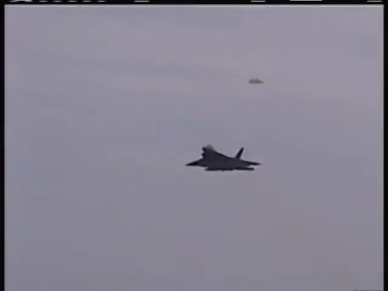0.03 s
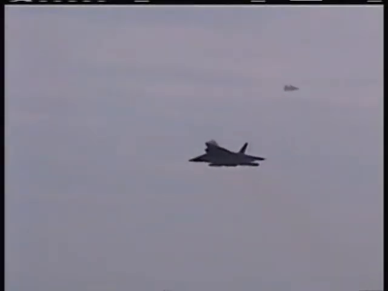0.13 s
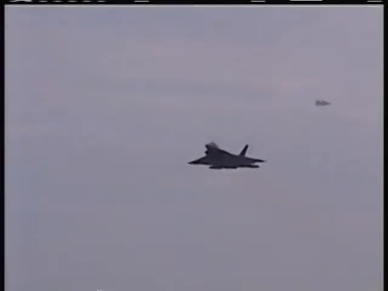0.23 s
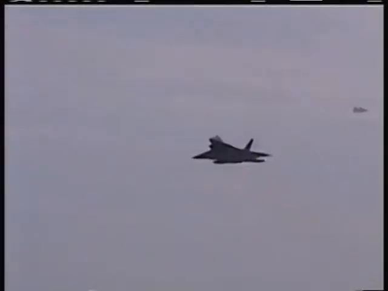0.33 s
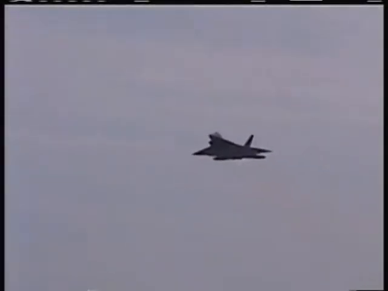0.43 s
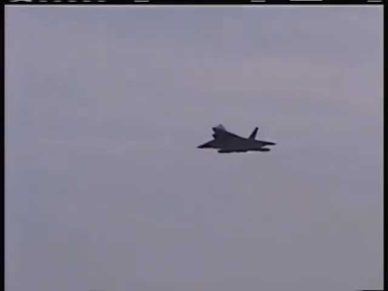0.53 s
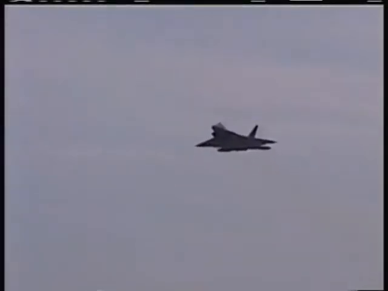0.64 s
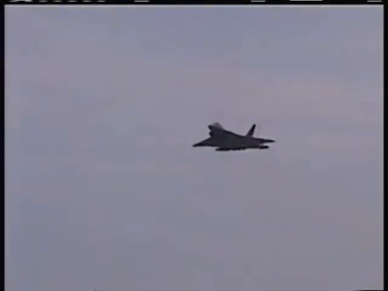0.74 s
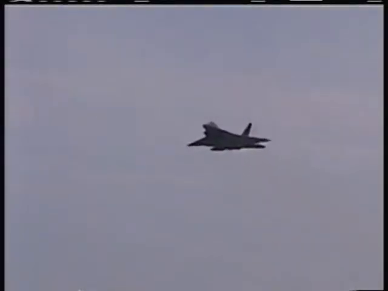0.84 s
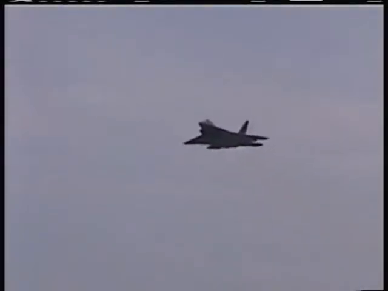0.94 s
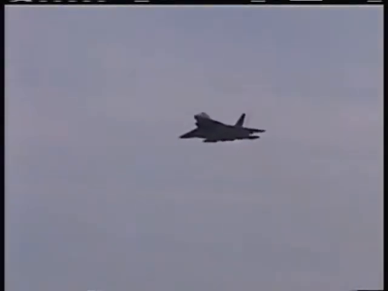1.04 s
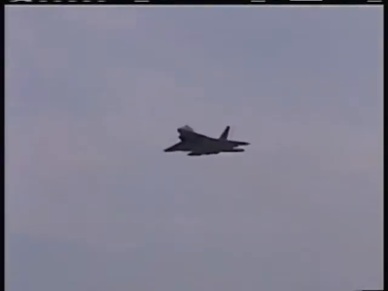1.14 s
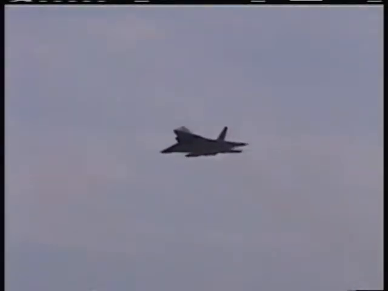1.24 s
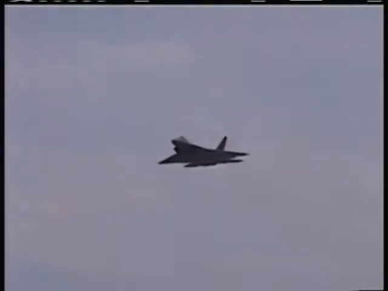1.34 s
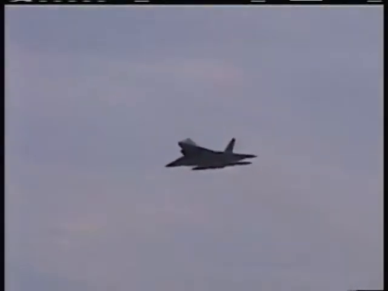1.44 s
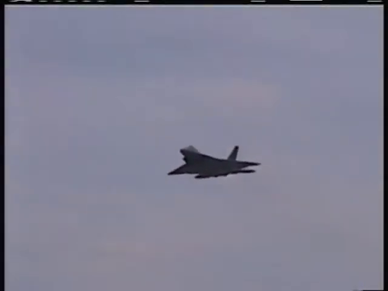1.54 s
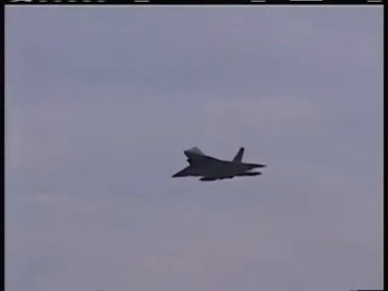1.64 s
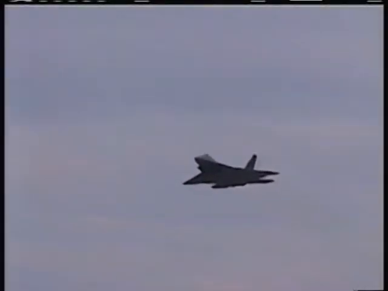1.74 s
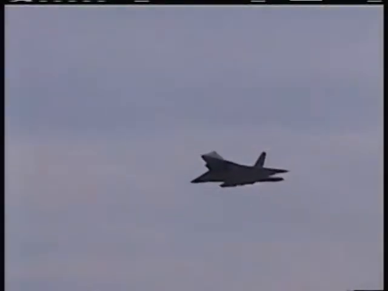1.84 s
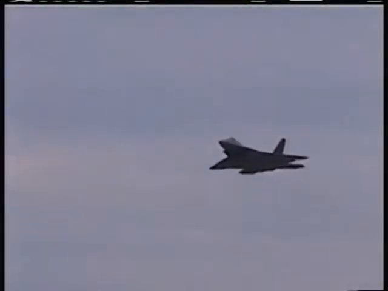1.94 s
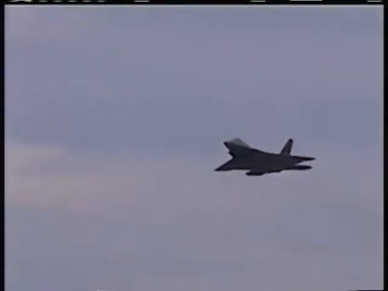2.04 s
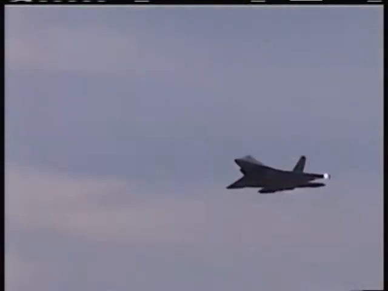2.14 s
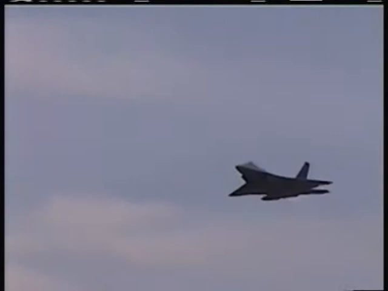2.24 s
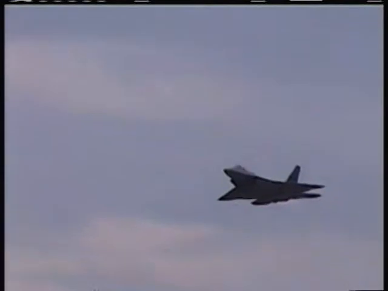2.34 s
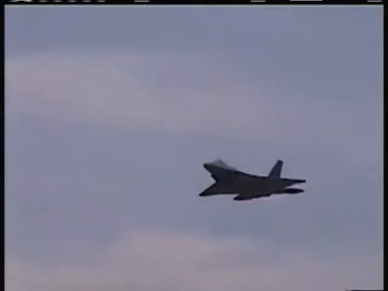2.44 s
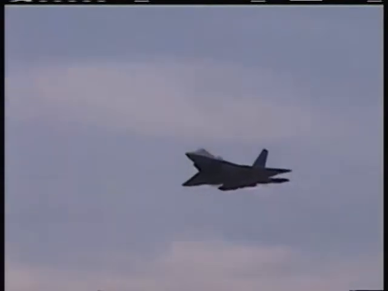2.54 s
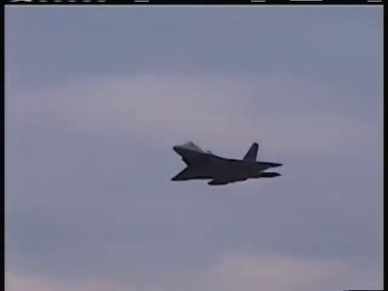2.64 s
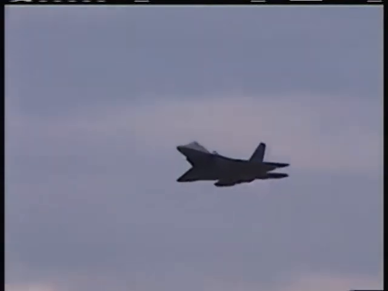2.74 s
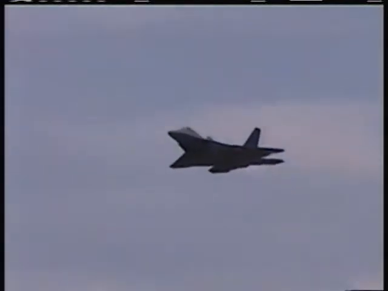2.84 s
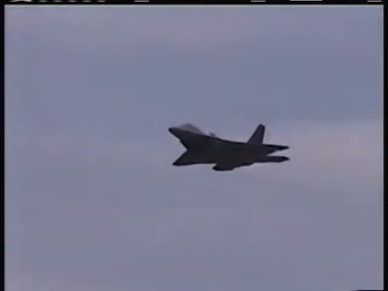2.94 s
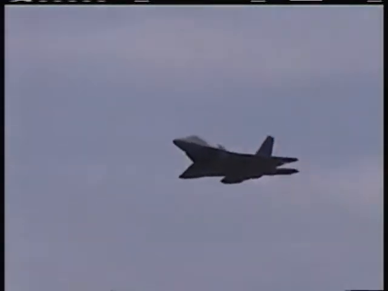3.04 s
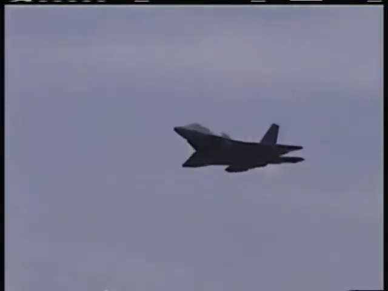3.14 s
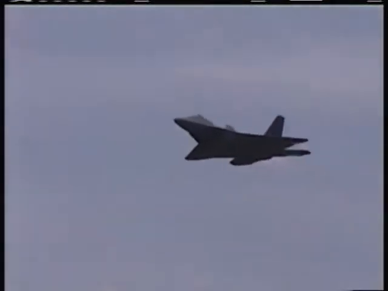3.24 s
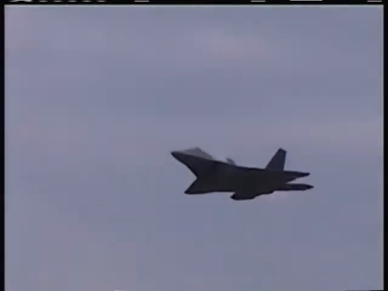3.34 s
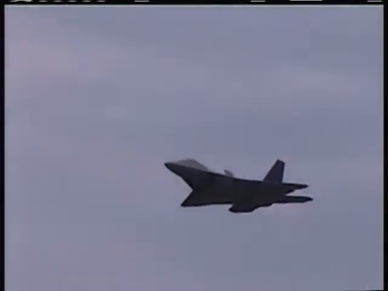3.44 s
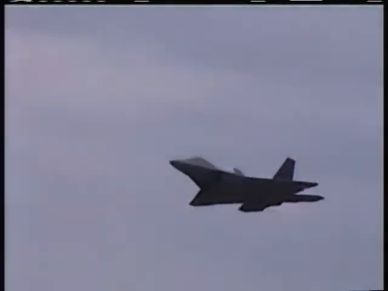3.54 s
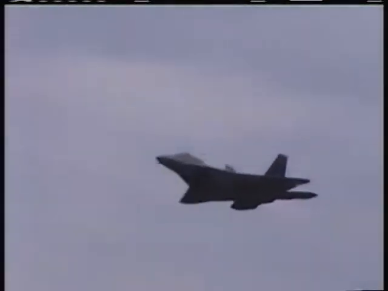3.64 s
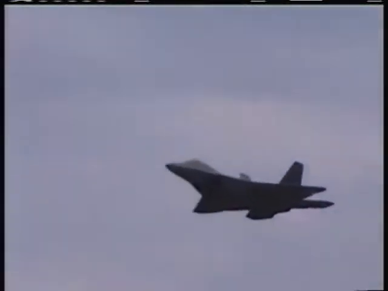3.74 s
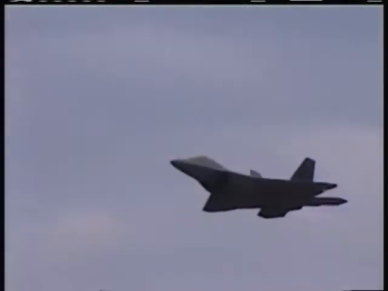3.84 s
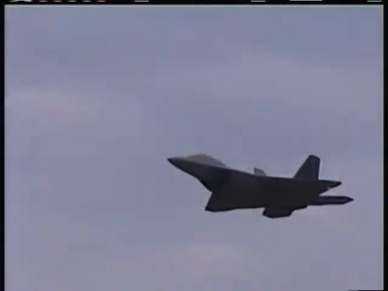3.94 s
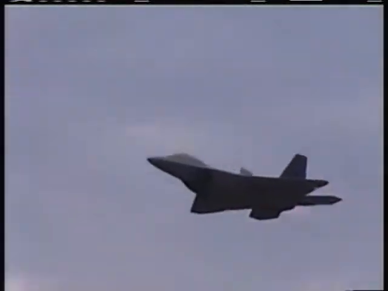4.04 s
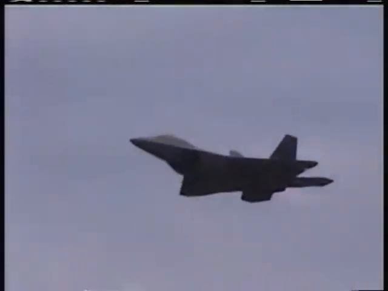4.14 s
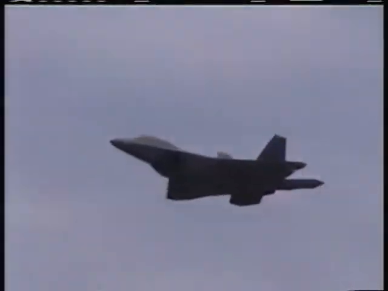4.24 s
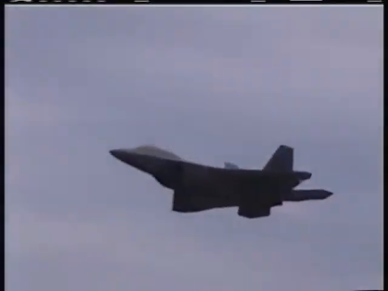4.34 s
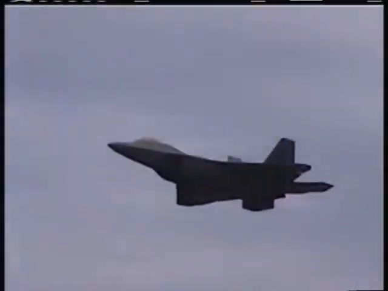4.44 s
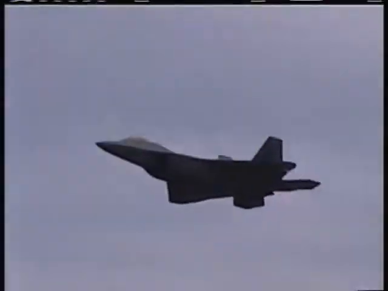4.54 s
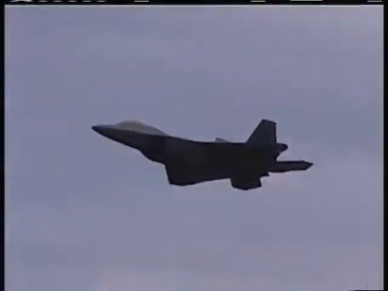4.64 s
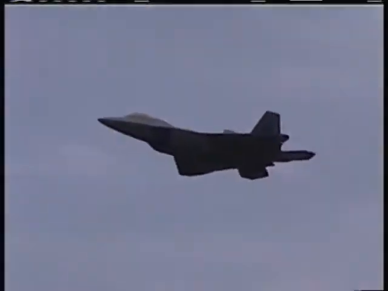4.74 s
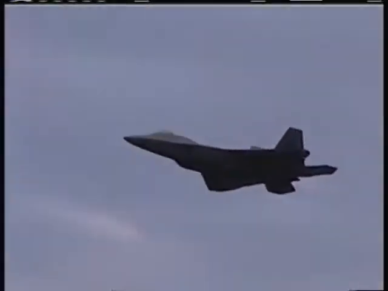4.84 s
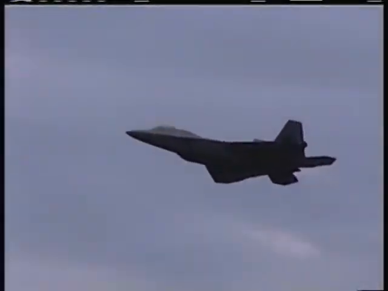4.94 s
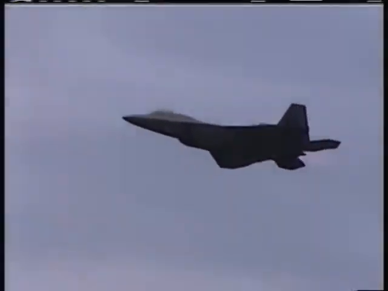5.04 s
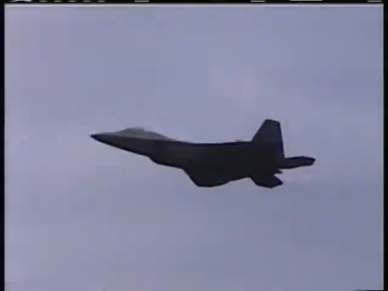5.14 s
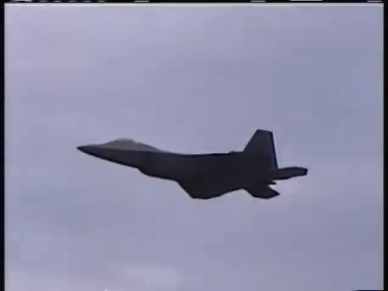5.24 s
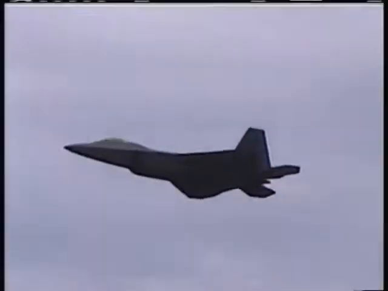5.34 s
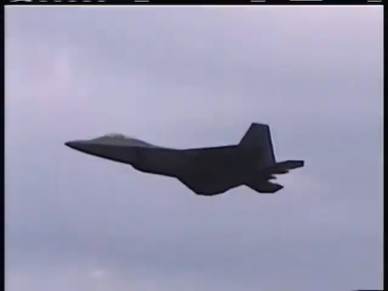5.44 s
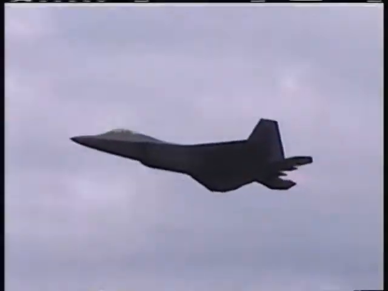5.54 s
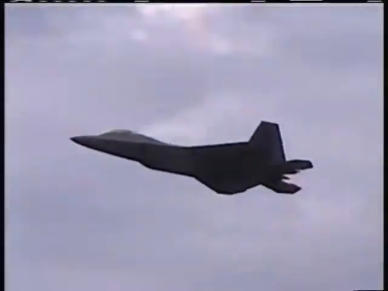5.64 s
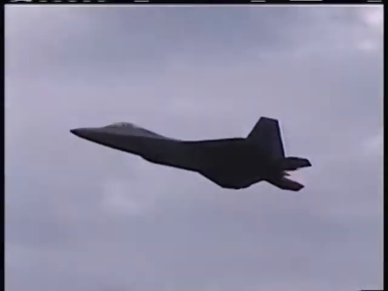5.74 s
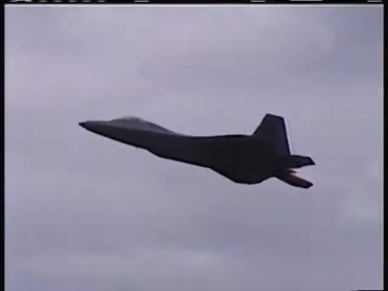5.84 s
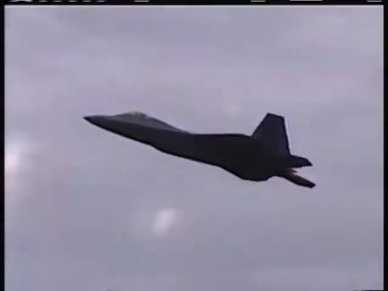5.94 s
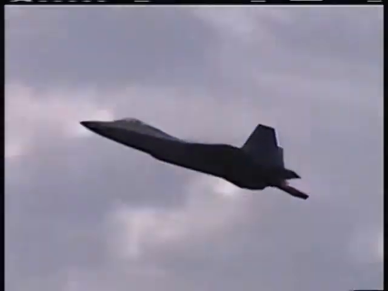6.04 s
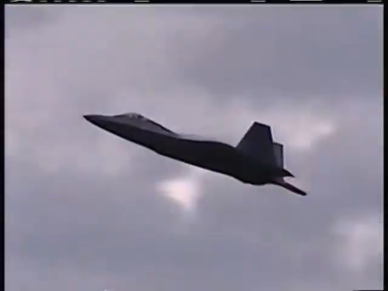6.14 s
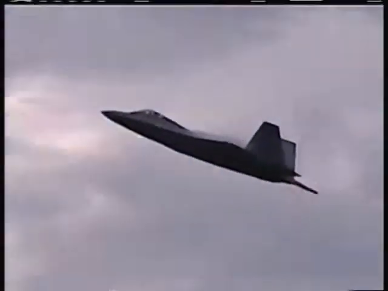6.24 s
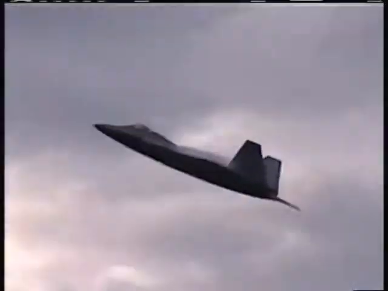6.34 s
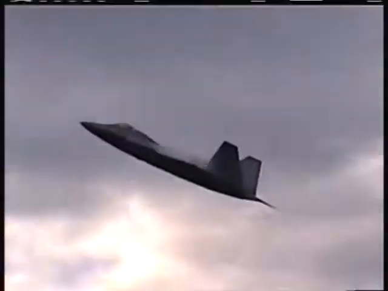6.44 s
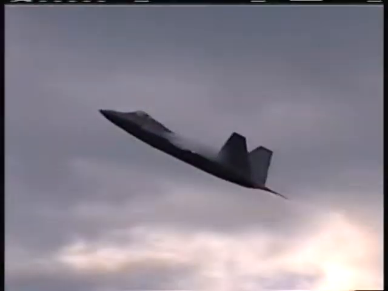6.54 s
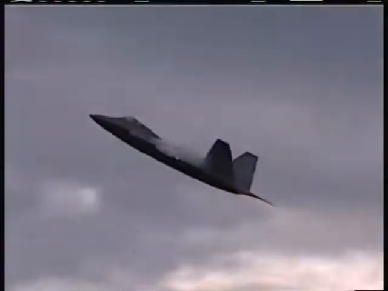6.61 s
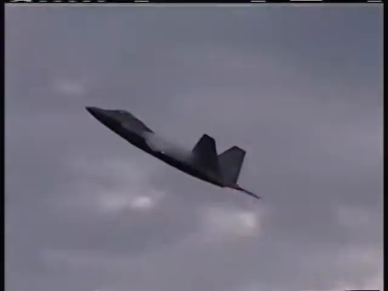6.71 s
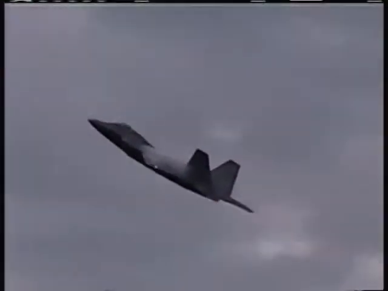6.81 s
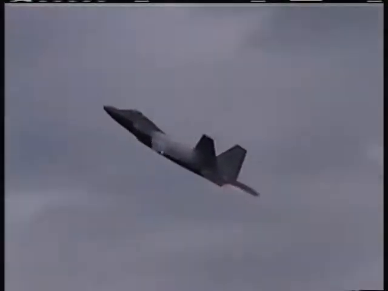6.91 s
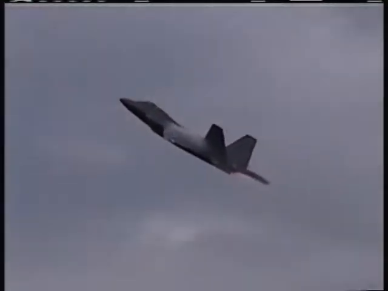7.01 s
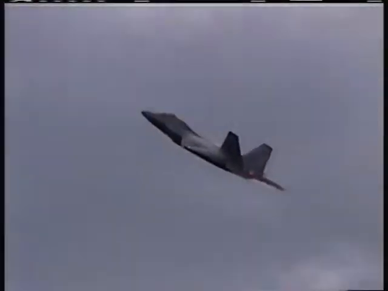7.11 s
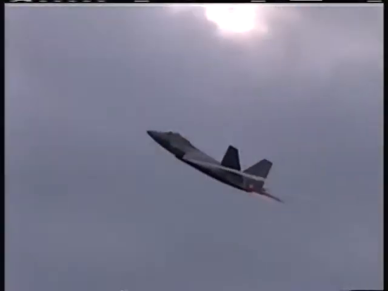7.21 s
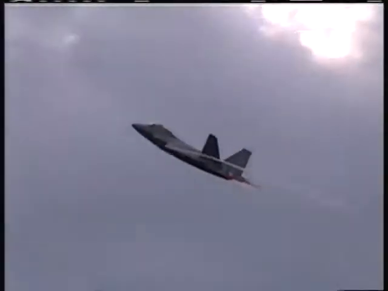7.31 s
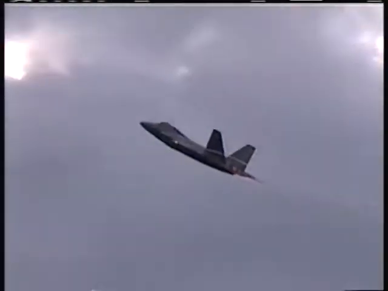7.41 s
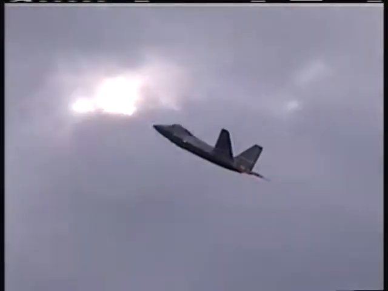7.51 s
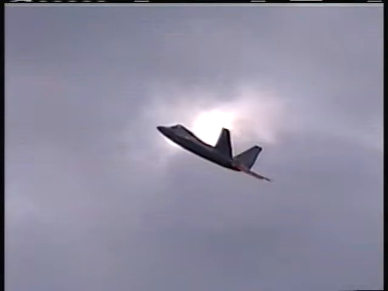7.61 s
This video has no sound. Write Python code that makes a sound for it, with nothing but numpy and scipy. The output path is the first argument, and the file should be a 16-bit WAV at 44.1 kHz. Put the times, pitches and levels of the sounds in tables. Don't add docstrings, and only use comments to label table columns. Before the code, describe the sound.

Two fighter jets over an open field: one dull roar dies away, another grows into a tearing, crackling roar with a sweeping hollow tone.

```python
import sys
import numpy as np
from scipy import signal
from scipy.io import wavfile
from scipy.ndimage import map_coordinates

SR = 44100
rng = np.random.default_rng(int(sys.argv[2]) if len(sys.argv) > 2 else 0)


def waveform_to_disk(signal):
    frames = np.transpose(np.atleast_2d(signal))
    scaled = np.clip(frames, -1, 1) * 32767
    samples = np.round(scaled).astype(np.int16)
    wavfile.write(sys.argv[1], SR, samples)


def how_loud(loudness_db):
    steps = np.asarray(loudness_db, float) / 20
    return 10 ** steps


N = 338247
FRAME = 1024


def rms_one(x):
    return x / np.sqrt(np.mean(x ** 2) + 1e-20)


def column(rows, index, at):
    rows = np.array(rows)
    return np.interp(at, rows[:, 0], rows[:, index])


def fade(start, end):
    return np.clip((np.arange(N) / SR - start) / (end - start), 0, 1)


def bandpass(x, order, low_hz, high_hz):
    return signal.sosfilt(signal.butter(order, [low_hz, high_hz], "band", fs=SR, output="sos"), x)


def drift(shape, frames):
    r = np.exp(-1 / max(frames, .1))
    wide = rng.standard_normal(shape[:-1] + (shape[-1] + 200,))
    return rms_one(signal.lfilter([1], [1, -2 * r, r * r], wide)[..., 200:])


def colour(x, spectrum):
    hz, s, cells = signal.stft(x, SR, nperseg=FRAME, noverlap=FRAME * 3 // 4)
    points = np.array(spectrum)
    tilt_db = np.interp(np.log(hz + 1), np.log(points[:, 0]), points[:, 1], right=-120)
    return hz, s, cells * how_loud(tilt_db)[:, None]


def sound(cells):
    return signal.istft(cells, SR, nperseg=FRAME, noverlap=FRAME * 3 // 4)[1][:N]


def bumps(rows, s):
    return sum(db * np.exp(-((s - at) / max(length, .02)) ** 2) for at, db, length in rows)


def focus(hz, s, swells, spread):
    octaves = np.log2(hz[:, None] + 1)
    gain_db = 0
    for at, mid_hz, db, length in swells:
        off_time = (s - at) / length
        off_pitch = (octaves - np.log2(mid_hz)) / spread
        gain_db = gain_db + db * np.exp(-off_time ** 2 - off_pitch ** 2)
    return how_loud(gain_db)


def turbulence(crackle_per_s, crackle_db):
    born = rng.random(N) < crackle_per_s / SR
    sizes = how_loud(crackle_db + 4.56 * np.minimum(rng.exponential(1, N), 4))
    return rms_one(rng.standard_normal(N) - born * sizes)


def jet(path, spectrum, source, treble_hz, usual_db, slope, bass_hz, usual_bass_db, flicker_db, patch_db):
    hz, s, cells = colour(source, spectrum)
    scale = 1 / np.sqrt(np.mean(sound(cells) ** 2))
    weight = np.minimum((hz / treble_hz) ** slope, 1.5)[:, None]
    lows = (1 / (1 + (hz / bass_hz) ** 4))[:, None]
    together = drift(s.shape, .35) + .5 * drift(s.shape, 2.5)
    coarse = drift((24, len(s)), 4.5)
    place = np.interp(np.log(hz + 1), np.log([100, 14000]), [0, 23])
    patches = map_coordinates(coarse, np.meshgrid(place, np.arange(len(s)), indexing="ij"), order=1)
    level_db = column(path, 1, s)
    air_db = weight * (column(path, 2, s) - usual_db)
    air_db = air_db + np.minimum(weight, .7) * flicker_db * together
    beam_db = lows * (column(path, 3, s) - usual_bass_db)
    return hz, s, scale * cells * how_loud(level_db + air_db + beam_db + patch_db * patches)


def by_ground(x, lags, strength, dull_hz, wobble):
    n = np.arange(N)
    shaken = np.interp(n / 256, np.arange(N // 256 + 1), drift((N // 256 + 1,), 5.0))
    lag_ms = column(lags, 1, n / SR) * (1 + wobble * shaken)
    late = np.interp(n - lag_ms * SR / 1000, n, x)
    return x + strength * signal.lfilter(*signal.butter(1, dull_hz, fs=SR), late)


def steepen(x, samples):
    n = np.arange(N)
    return np.interp(n + samples * x / np.std(x), n, x)


def ripple(x):
    depth_db, above_hz = 1.7, 2500
    high = signal.sosfiltfilt(signal.butter(1, above_hz, "high", fs=SR, output="sos"), x)
    shake = np.interp(np.arange(N) / 32, np.arange(N // 32 + 1), drift((N // 32 + 1,), 2.5))
    return x + (how_loud(depth_db * shake - 1.5) - 1) * high


# t/s, peak level/dB, length/s
GUST_TABLE = [(0.13, -38.5, 0.19), (0.627, -47.5, 0.23), (1.045, -53, 0.14), (2.43, -59, 0.031),
              (3.35, -66, .2), (4.96, -54, 0.057), (5.543, -52, .1), (5.85, -48.5, 0.099),
              (6.161, -47, 0.13), (6.444, -59, 0.12), (6.737, -48, .08), (7.276, -47, 0.073),
              (7.66, -38, .1)]


def wind():
    calm_db, breeze_db, from_s, rise_s = -64, -54.0, 5.7, 0.69
    s = np.arange(N) / SR
    low = bandpass(rng.standard_normal(N), 2, 55, 125)
    breeze = how_loud(calm_db + (breeze_db - calm_db) * fade(from_s, from_s + rise_s))
    gusts = sum(how_loud(db) * np.exp(-((s - at) / length) ** 2) for at, db, length in GUST_TABLE)
    return (breeze + gusts) * rms_one(low)


# t/s, centre f/Hz, level/dB
FAR_HUMP = [(0.0, 527.4, -49), (0.2, 502, -32), (0.35, 467, -26), (0.55, 450, -33.5), (0.8, 418, -28.5),
            (1.0, 417, -37), (1.25, 463, -31.5), (1.55, 422, -44.5), (1.8, 370, -33.5), (2.2, 393, -37.5),
            (2.6, 374, -41), (3.0, 450, -48), (3.4, 360, -30), (3.6, 432, -36), (3.8, 400, -36),
            (4.2, 461, -30), (4.6, 472, -29), (4.8, 380, -48)]


def hump():
    hz, s, cells = colour(rng.standard_normal(N), [(20, .1), (20000, .1)])
    off_hz = hz[:, None] - column(FAR_HUMP, 1, s)
    width_hz = np.where(off_hz > 0, 70, 35)
    band = rms_one(sound(cells * np.exp(-.5 * (off_hz / width_hz) ** 2)))
    return how_loud(column(FAR_HUMP, 2, np.arange(N) / SR) - 1.5) * fade(5.2, 4.8) * band


# t/s, level/dB
LEAVING_LEVEL = [(0.0, -46), (0.15, -33), (0.6, -33.5), (0.8, -36), (1.35, -38), (1.75, -35.5),
                 (2.0, -40.5), (2.4, -35), (2.55, -34), (2.9, -34.5), (3.2, -32.5), (3.45, -26),
                 (3.65, -27), (4.1, -36)]
# t/s, gain/dB, length/s
FAR_ROLLS = [
    (1.6, 3.5, 0.18),
    (2.42, 10, 0.15),
    (2.68, 6, 0.13),
    (3.15, 5.5, 0.065),
    (3.45, -6.5, 0.2),
]


def leaving_path():
    treble_db, treble_steady = -16.5, 0.95
    bass_db, bass_steady = -13, 0.97
    s = np.arange(0, N / SR, .01)
    level_db = column(LEAVING_LEVEL, 1, s)
    swing_db = level_db + 36
    treble = treble_db - treble_steady * swing_db
    bass = bass_db - bass_steady * swing_db + bumps(FAR_ROLLS, s)
    return np.c_[s, level_db, treble, bass]


# f/Hz, level/dB per Hz
LEAVING_SPECTRUM = [(60, -51.5), (130, -24), (200, -6.5), (290, -13), (420, -8), (600, -6), (850, -5.5),
                    (1100, -12), (2000, -21), (3500, -33), (4800, -47), (6000, -63.5), (9000, -71)]
# t/s, centre f/Hz, gain/dB, length/s
FAR_SWELLS = [(0.074, 760, 7.5, 0.13), (1.05, 800, 4, 0.12), (2.5, 510, 3.5, .07), (1.41, 1600, 7, .1),
              (1.944, 1460, 8.5, .12), (2.2, 250, 3.5, .08), (3.5, 1400, 8.5, .06),
              (3.08, 3000, -6.5, 0.034), (1.75, 650, 3.5, 0.11), (2.796, 1210, 9.5, 0.068),
              (2.8, 5000, 7, 0.6)]


def leaving_jet():
    hz, s, cells = jet(leaving_path(), LEAVING_SPECTRUM, turbulence(150, 8.8),
                       treble_hz=4200, usual_db=-15.5, slope=0.67,
                       bass_hz=320, usual_bass_db=-12.0, flicker_db=3.2, patch_db=1.85)
    turns = (hz[:, None] / column(FAR_HUMP, 1, s) - 1) / 0.78
    echo = .7 / (1 + (hz[:, None] / 480) ** 2)
    comb = np.abs(1 + echo * np.exp(2j * np.pi * turns))
    heard = sound(cells * focus(hz, s, FAR_SWELLS, 0.4) * comb)
    return how_loud(2.5) * fade(4.54, 3.03) * heard


# t/s, peak level/dB
SHOCK_TABLE = [(1.8933, -61), (1.9719, -56), (1.981, -55), (2.2074, -62), (2.8464, -55), (2.955, -59),
               (3.003, -59), (3.243, -60), (3.386, -64), (3.498, -48), (3.512, -49), (3.537, -53),
               (3.59, -56), (3.6157, -49), (3.667, -49), (3.685, -48), (3.808, -48), (3.899, -45),
               (4.155, -52)]


def shocks():
    clicks = np.zeros(N)
    for at, db in SHOCK_TABLE:
        clicks[round(at * SR)] = -how_loud(db + 26.5)
    return bandpass(clicks + 1e-18, 3, 1500, 6000)


# t/s, peak level/dB, length/s
BUNCH_TABLE = [(3.506, -38, 0.015), (3.612, -56, 0.02), (3.66, -45, 0.013), (3.79, -42, 0.031),
               (3.817, -54, 0.025), (3.88, -49, 0.017), (4.026, -41, 0.029), (4.155, -40, 0.028),
               (4.2294, -49, 0.03), (4.42, -36, 0.015), (4.694, -38, 0.03), (4.864, -42, 0.054),
               (5.053, -56, 0.027), (5.186, -38, 0.041), (5.3294, -59, 0.024), (5.57, -27.5, 0.03),
               (6.086, -29, 0.03)]


def bunches():
    s = np.arange(N) / SR
    envelope = np.zeros(N)
    for at, db, length in BUNCH_TABLE:
        after = np.clip((s - at + 0.0035) / max(length, .008), 0, 30)
        envelope += how_loud(db) * 0.7 * np.minimum(6 * after, 1) * np.exp(-(after / 1.2) ** 4)
    spray = bandpass(turbulence(400, 21.0), 3, 2600, 7000)
    return how_loud(-14.0) * envelope * rms_one(spray)


# t/s, level/dB
PASSING_LEVEL = [(3.1, -36.5), (3.5, -33.5), (3.85, -37), (4.2, -34), (4.6, -39.5), (5.0, -34),
                 (5.35, -35.5), (5.58, -31), (5.74, -34.5), (6.0, -30), (6.7, -31.5), (7.0, -32),
                 (7.67, -33)]
# t/s, lag/ms
GROUND_LAG = [(3.4, 0.18), (3.9, 0.34), (4.25, 0.46), (4.93, 0.68), (5.1, 1.04), (5.55, 1.41), (5.9, 1.85),
              (6.15, 1.84), (6.63, 2.3), (6.85, 2.28), (7.15, 2.1), (7.6, 2.066)]
# t/s, gain/dB, length/s
TREBLE_CLEARINGS = [(3.62, 4, 0.11), (4.22, -3.5, 0.13), (4.33, -4.5, .02), (4.42, 5.5, 0.038),
                    (4.56, 0, 0.091), (4.72, 5, 0.1), (5.1, -1.5, .05), (5.26, -4, 0.032), (5.34, 3, 0.03),
                    (5.57, 2, .05), (5.76, 3.5, 0.036), (5.93, -2.5, 0.058), (6.1, 2.5, 0.044),
                    (6.43, 0.5, .02), (6.78, -1, 0.031), (6.2, -3, 0.097), (6.495, -5, 0.018),
                    (7.36, 2, 0.053)]
# t/s, gain/dB, length/s
NEAR_BASS_ROLLS = [
    (4.2, -6, 0.88),
    (4.62, 12, 0.16),
    (5.7, 2, 0.22),
    (6.6, -1, .2),
    (7.22, 3, 0.085),
]


def passing_path():
    haze_db, clears_db_per_ms = -25.5, 4.5
    front_bass_db, tail_turn_s, tail_bass_db_per_s = 0.36, 6.63, 13
    s = np.arange(0, N / SR, .01)
    treble_db = haze_db + clears_db_per_ms * column(GROUND_LAG, 1, s) + bumps(TREBLE_CLEARINGS, s)
    tail_db = tail_bass_db_per_s * np.maximum(s - tail_turn_s, 0)
    bass_db = front_bass_db + tail_db + bumps(NEAR_BASS_ROLLS, s)
    return np.c_[s, column(PASSING_LEVEL, 1, s), treble_db, bass_db]


# f/Hz, level/dB per Hz
PASSING_SPECTRUM = [(60, -46), (140, -17.5), (230, -12), (330, -10), (500, -4.5), (700, -4), (930, -4),
                    (1200, -7.5), (2200, -15.5), (4500, -26.5), (8000, -44.5), (14000, -61.5)]
# t/s, centre f/Hz, gain/dB, length/s
NEAR_FOCUS = [(3.754, 2760, 3.5, 0.3), (4.156, 348, 13, 0.65), (4.407, 1720, 3.5, .1), (4.45, 600, -3, .12),
              (4.6, 820, 2.5, 0.17), (4.806, 1320, 0, 0.053), (4.978, 800, 3.5, .06),
              (5.094, 1014, -7, .05), (5.153, 866, 5, 0.1), (5.355, 398, 11.5, 0.36), (5.9, 1100, -3, .15),
              (6.105, 565, 3.5, 0.36), (6.15, 804, -5.5, 0.28), (6.3, 225, 6.5, 0.29),
              (6.407, 403, -8.5, 0.44), (6.743, 894, 2.5, .25), (7.16, 280, 6, 0.26)]


def passing_jet():
    hz, s, cells = jet(passing_path(), PASSING_SPECTRUM, turbulence(300, 5.8),
                       treble_hz=6000, usual_db=-17.5, slope=0.82,
                       bass_hz=396, usual_bass_db=0.068, flicker_db=3.0, patch_db=0.83)
    direct = sound(cells * focus(hz, s, NEAR_FOCUS, 0.18))
    heard = by_ground(direct, GROUND_LAG, strength=.66, dull_hz=2600, wobble=.04)
    return how_loud(7.5) * fade(2.9, 4.12) * heard


def scene():
    jets = steepen(leaving_jet() + hump() + passing_jet(), .35)
    crackle = shocks() + bunches()
    rumble = wind()
    return (ripple(jets) + crackle + rumble)[None]


def top_cut(x):
    return signal.sosfilt(signal.butter(12, 16600, fs=SR, output="sos"), x)


# f/Hz, level/dB per Hz
HISS_SPECTRUM = [(3530, -44.5), (6000, 2), (11200, 2.5), (15200, 1), (15600, 4.5)]
# f/Hz, rms level/dB
WHISTLE_TABLE = [
    (10788, -95),
    (15735, -94),
]


def record(dry):
    r = np.exp(-1 / (0.042 * SR))
    power = signal.lfilter([1 - r], [1, -r], dry ** 2) + 1e-5
    held = dry * (power / 0.025 ** 2) ** -.12
    top, bias = .135, .012
    tape = top * (np.tanh((1.055 * held + bias) / top) - np.tanh(bias / top))
    tape = bandpass(tape, 2, 45, 10000)
    hiss = how_loud(-76) * rms_one(sound(colour(rng.standard_normal(N), HISS_SPECTRUM)[2]))
    s = np.arange(N) / SR
    tones = sum(np.sqrt(2) * how_loud(db) * np.sin(2 * np.pi * hz * s) for hz, db in WHISTLE_TABLE)
    tape = tape * fade(N / SR, N / SR - .004)
    return top_cut(tape + hiss + tones)


dry = scene()
out = record(dry)
waveform_to_disk(out)
```